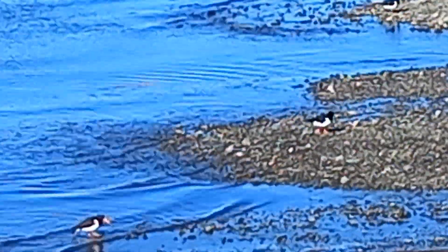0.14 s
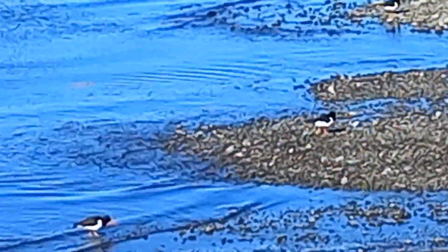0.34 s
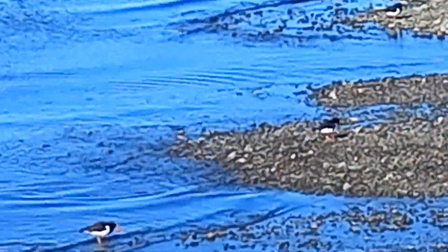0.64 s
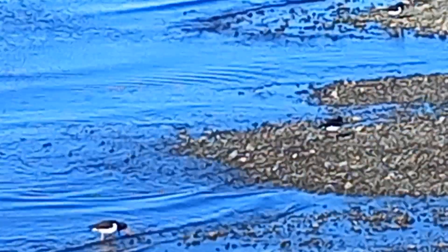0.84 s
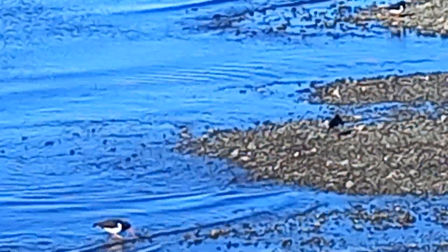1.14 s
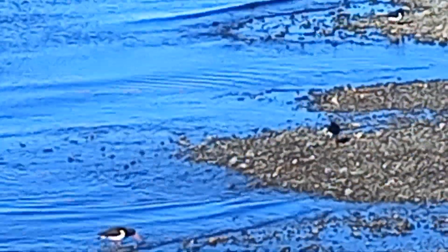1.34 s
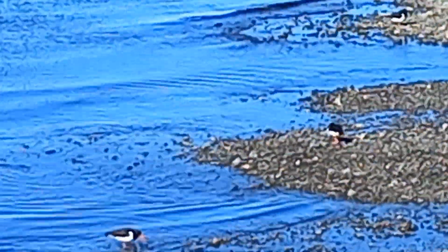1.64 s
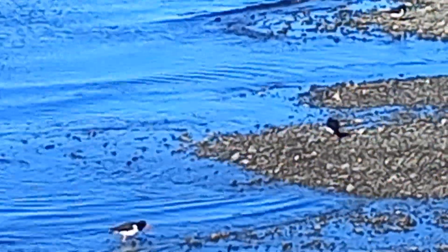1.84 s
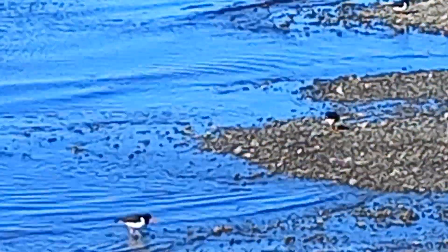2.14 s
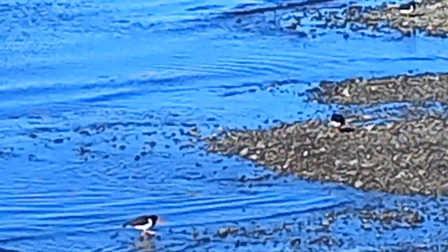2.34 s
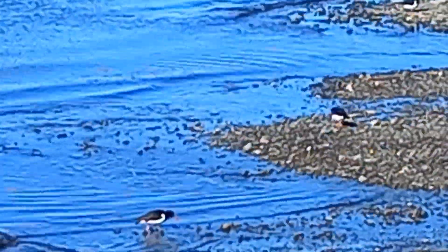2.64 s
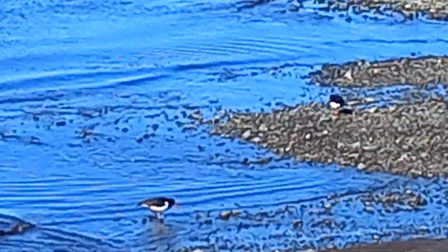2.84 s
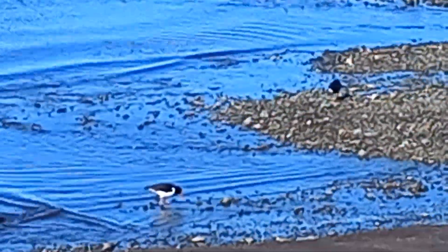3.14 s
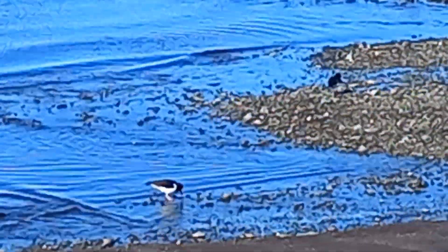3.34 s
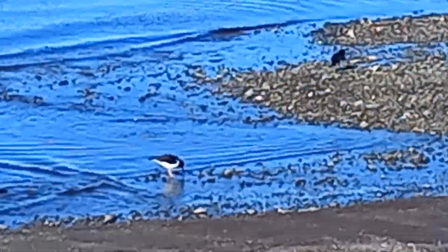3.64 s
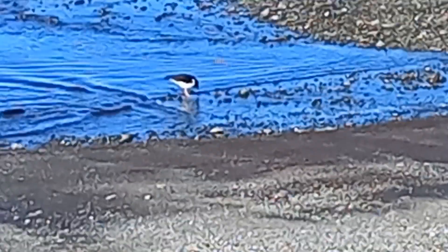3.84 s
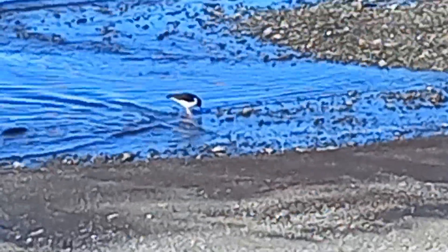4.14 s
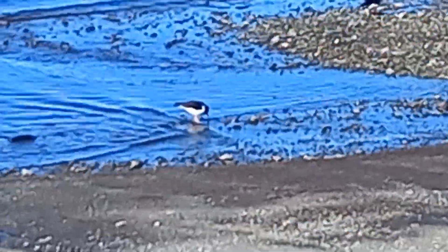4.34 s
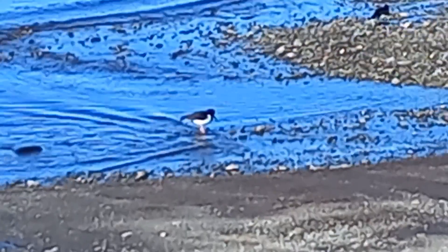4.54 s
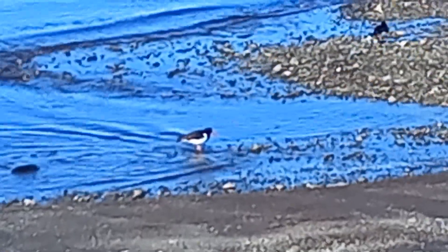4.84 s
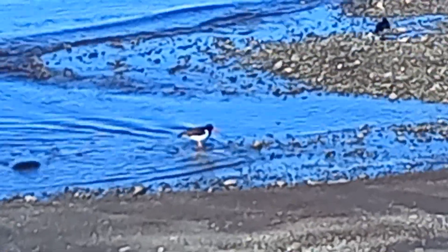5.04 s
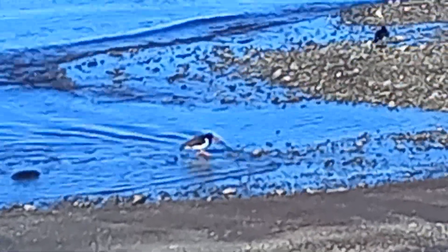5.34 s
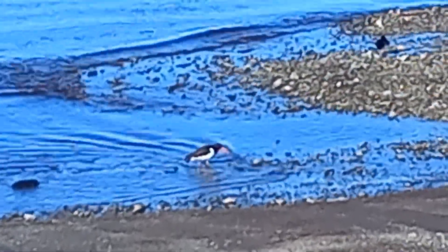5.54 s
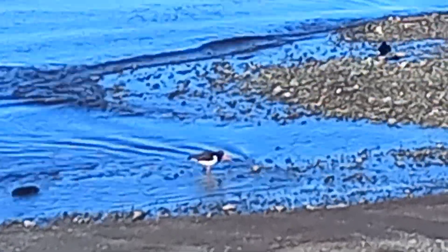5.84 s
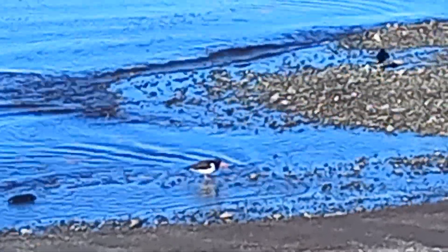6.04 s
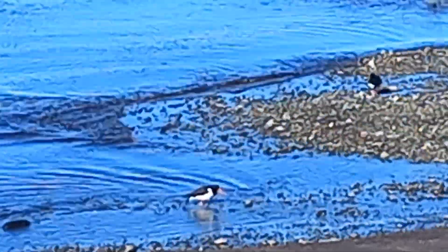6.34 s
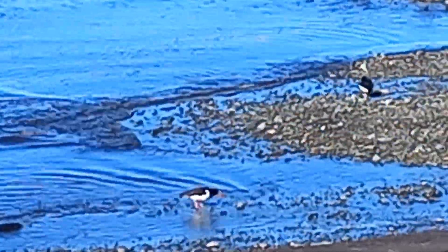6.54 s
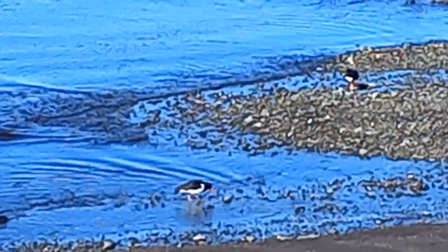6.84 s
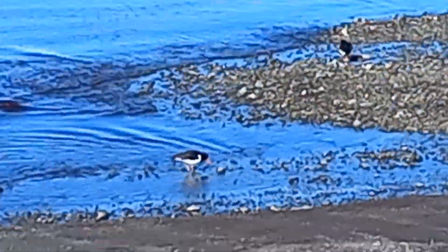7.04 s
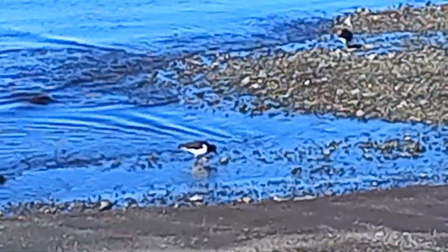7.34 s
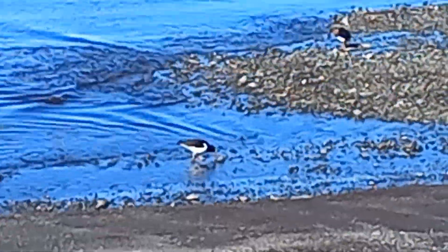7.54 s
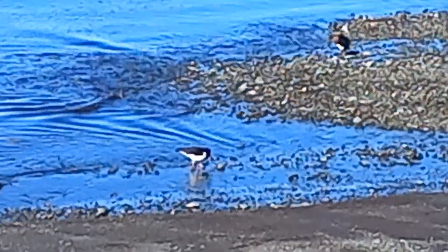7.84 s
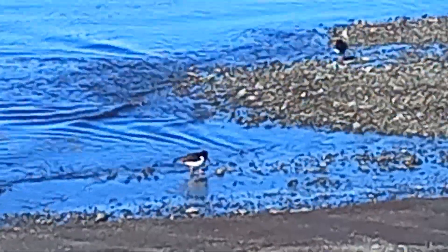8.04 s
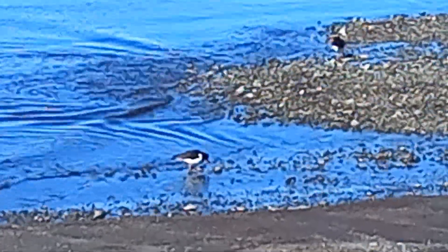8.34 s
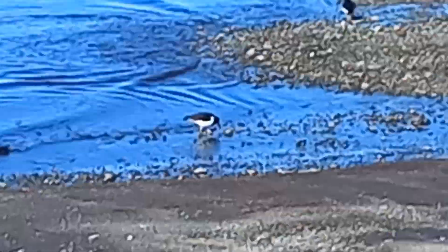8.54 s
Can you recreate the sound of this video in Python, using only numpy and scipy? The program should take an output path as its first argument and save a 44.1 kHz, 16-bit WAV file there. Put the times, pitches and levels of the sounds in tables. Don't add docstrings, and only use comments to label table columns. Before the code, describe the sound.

Throughout, a diesel engine idles at a steady pace, about twenty-two pulses a second, giving a low buzzing throb with fine metallic ticking, somewhat to the right, and a soft low fan hum. A muted wash of shore and engine noise fills the background. From 0.3 s, small wavelets gurgle quietly over stones on the left, returning in irregular short runs, fuller from 1.8 to 5.5 s. Wind thumps the left side, heaviest at 1.2 to 1.4 s, again near 1.8, 2.5 and 4.3 s. A harder metallic tick comes at 0.8 s. Drips and plops cluster around 1.8 to 2.3 s, then a faint wavering moan at 2.6 s. Hollow low surges swell ahead, strongest at 3.7, 4.4 and 4.9 s. A lone plop falls at 5.6 s, another surge at 6.8 s, and a bright drip with fine spray on the right at 7.3 s. It stops abruptly at 8.6 s.

```python
import sys
import numpy as np
from scipy import signal
from scipy.fft import rfft, irfft, next_fast_len
from scipy.io import wavfile
from scipy.ndimage import uniform_filter1d

SR = 44100
rng = np.random.default_rng(int(sys.argv[2]) if len(sys.argv) > 2 else 0)


def amplitude_ratio(level_db):
    exponent = np.asarray(level_db, float) / 20
    return 10 ** exponent


def to_wav(sig):
    pcm = np.clip(np.atleast_2d(sig), -1, 1) * 32767
    pcm = np.round(pcm).astype(np.int16)
    wavfile.write(sys.argv[1], SR, pcm.T)


N = 383229
LAG_SAMPLES = 19.4

# (time [s], rate [Hz])
FIRING_RATE = [(0.0, 21.877), (0.6, 22.075), (1.4, 21.757), (2.0, 21.9), (2.4, 22.091), (4.0, 21.93),
               (5.0, 21.932), (5.4, 22.127), (5.8, 21.919), (6.0, 22.022), (6.6, 22.043), (7.2, 21.876),
               (8.2, 22.044), (8.6, 21.71)]
# (multiple of firing rate [1], left level [dB], right level [dB])
EXHAUST_ORDERS = [(2.0, -61, -60), (3.0, -49, -50), (4.0, -50, -55), (5.0, -49, -52), (6.0, -51, -51),
                  (7.0, -42, -43), (7.5, -59, -60), (8.0, -46, -48), (8.5, -66, -77), (9.0, -58, -62),
                  (10.0, -69, -64), (11.0, -68, -70), (13.0, -61, -65), (14.0, -65, -66), (16.0, -63, -65),
                  (18.0, -69, -69), (20.0, -70, -75), (22.0, -75, -71)]
# (left level [dB], right level [dB], decay to -60 dB [s], delay [firings], share of a hard blow [1])
VALVE_PARTS = [(-84, -80.5, 0.037, 0.18, 0.81), (-82.5, -81.5, 0.014, 0.13, .6),
               (-94, -83, .015, 0.043, .4), (-94, -84, 0.063, .3, .3), (-95, -80.5, .03, 0.089, 0.71),
               (-100, -80.5, 0.0083, 0.17, 0.25), (-106, -109.5, .02, 0.5, 0.33), (-108, -97, .01, .55, .3),
               (-73, -69.5, 0.076, 0.27, 0.092), (-100, -91, .001, 0.093, 0.2)]
VALVE_HZ = [3737, 3640, 5450, 6274, 7497, 8350, 11060, 11480, 950, 13500]
CYLINDERS_DB = [5, 3, 5, -3]
# (time [s], level [dB])
HARD_BLOWS = [(0.0922, -65), (0.1999, -63), (0.2877, -64), (0.3805, -64), (0.6045, -67), (0.6659, -65),
              (0.7861, -50), (1.1563, -63), (1.3339, -58), (1.477, -63), (1.6541, -65), (1.7015, -65.5),
              (2.2039, -64), (2.384, -60), (2.4718, -62), (2.7467, -67), (2.9796, -58), (3.3872, -60),
              (4.0238, -64), (4.2477, -67), (4.2981, -56), (4.6144, -58), (5.2106, -63), (7.2095, -63),
              (7.3008, -62), (7.4824, -67), (7.7533, -67), (7.8461, -61), (8.3933, -56)]
# (peak time [s], level [dB], length [s])
LOOSE_SPELLS = [(.25, 5, 0.44), (1.12, 1, 0.31), (1.421, 3, .2), (1.75, 3.5, .4), (2.25, 3, .5),
                (2.78, 4, .15), (3.282, 5.5, .3), (3.72, 6.5, 0.37), (4.3, 3, .15), (5.057, 1, .12),
                (6.067, 1, .15), (6.85, 0.5, .3), (7.3, -4, .25), (7.7, 2.5, 0.39), (8.5, 2, .3)]
# (peak time [s], gurgle level [dB], length [s], fizz above gurgle [dB])
WAVELETS = [(0.322, -72.5, .15, 0.5), (.52, -71, .12, -14), (1.36, -71, .12, -6), (1.85, -67.5, 0.26, -13),
            (2.1, -67.5, 0.52, -8), (2.948, -68, 0.23, -11), (3.205, -62.5, 0.39, -7),
            (3.544, -69, 0.32, -5), (3.83, -67, 0.29, -2.5), (4.247, -70, 0.32, -8),
            (4.5, -67.5, 0.18, -11), (4.853, -69.5, 0.4, -13), (5.25, -68.5, .35, -5.5),
            (5.548, -75, 0.23, -4), (6.05, -82, .2, -2), (6.472, -72, 0.26, -8), (6.85, -69, 0.34, -9),
            (7.2, -72, .12, -10), (7.349, -71, 0.22, -3), (7.79, -73, 0.13, -7), (8.45, -71, .3, -5.5)]
# (frequency [Hz], level [dB])
GURGLE_COLOUR = [(500, -60), (900, -7), (1500, -7), (2100, -1), (2600, 0), (3300, -6), (4500, -40)]
FIZZ_COLOUR = [(2500, -40), (3400, -5), (4400, 0), (5200, -4), (6500, -10), (9000, -14), (12000, -40)]
SPRAY_COLOUR = [(3000, -41), (6000, -1), (9000, 1), (12000, -7), (15000, -15)]
# (time [s], level [dB], frequency [Hz], left over right [dB])
DRIPS = [
    (1.804, -55, 2020, 9),
    (2.089, -57, 3000, 12),
    (2.14, -56, 1880, 11),
    (2.160, -53, 2750, 7),
    (2.263, -52, 4450, 6),
    (5.64, -58, 1770, 4),
    (7.333, -48, 8000, -8),
]
# (peak time [s], level [dB], length [s])
SURGES = [(.75, -47, 0.13), (1.0, -49.5, .2), (1.318, -47, 0.34), (1.867, -48, 0.17), (2.14, -49, .1),
          (2.557, -47.5, 0.32), (3.0, -51.5, 0.17), (3.704, -41.5, 0.5), (4.06, -48.5, 0.26),
          (4.364, -39.5, 0.27), (4.916, -42, 0.42), (5.7, -51, .1), (6.6, -51.5, .2), (6.8, -44.5, 0.16),
          (7.0, -50, 0.34), (7.53, -48.5, .12), (7.85, -50.5, .1), (8.32, -47.5, 0.11), (8.547, -50, 0.091)]
# (frequency [Hz], level [dB])
SURGE_COLOUR = [(40, -41), (100, -2), (180, -3.5), (280, 1), (420, -8), (500, -14.5), (620, -29),
                (1200, -110)]
# (time [s], frequency [Hz], level [dB])
MOAN = [
    (2.48, 557, -76),
    (2.53, 583, -52.5),
    (2.62, 587, -53),
    (2.68, 538, -56),
    (2.73, 495, -82),
]
# (peak time [s], level [dB], length [s])
THUMPS = [(.14, -42, 0.17), (.33, -40.5, .14), (1.03, -46, .08), (1.18, -28.5, 0.098), (1.28, -31, 0.097),
          (1.364, -30, .1), (1.55, -43, 0.33), (1.782, -33.5, 0.089), (2.14, -40, 0.096), (2.36, -43, 0.11),
          (2.503, -35.5, 0.079), (3.827, -40, 0.13), (4.33, -35, 0.11), (5.98, -41, .1)]
# (frequency [Hz], level [dB])
WIND_COLOUR = [(35, -45), (55, -2.5), (75, 5.5), (100, -5.5), (140, 2.5), (200, -13.5), (300, -29),
               (500, -55), (1000, -110)]
# (frequency [Hz], density [dB per Hz])
WASH_LEFT = [(30, -104), (50, -90), (80, -71), (150, -67.5), (300, -73.5), (600, -77.5), (1000, -83),
             (1500, -94), (2800, -104), (4000, -103), (8500, -108), (10300, -118), (13500, -117),
             (15600, -114)]
WASH_RIGHT = [(30, -104), (50, -94), (80, -69.5), (150, -67.5), (300, -72), (900, -85), (1500, -93.5),
              (2500, -110), (3300, -103), (5500, -102), (8600, -107), (9500, -113), (11000, -111),
              (12500, -116)]
# (frequency [Hz], likeness [1])
LIKENESS = [(60, 1), (250, 0.6), (450, 0.37), (1000, 0.87), (1500, 0.15), (6000, 0.09), (10000, 0.05)]
# (frequency [Hz], width [Hz], left [dB], right [dB])
HOUSING = [(1000, 380, 1, 2), (1240, 87, -1.5, 0.5), (1463, 170, 3, 1.5), (1770, 510, 2.2, -4),
           (2670, 320, -1.5, -1.5), (3220, 320, 1.5, 1), (3920, 390, -0.5, 2.5), (4420, 300, -0.5, -3),
           (7040, 540, -0.5, -3), (9000, 350, 2.5, -7), (9800, 360, 6, 1), (11100, 860, -11, 4),
           (14000, 2400, 1.5, -1)]


def exhaust(turns):
    out = np.zeros((2, N))
    pipe_turns, pipe_spread = .27, .0143
    for order, left_db, right_db in EXHAUST_ORDERS:
        k = round(2 * order) / 2
        delay = pipe_turns * (k - 7) + pipe_spread * (k - 7) ** 2
        phase = 2 * np.pi * (k * turns - delay)
        side = left_leads(k * FIRING_RATE[0][1]) / 2 * np.array([[1], [-1]])
        level = ports_gain(left_db, right_db) * amplitude_ratio(0.49 * drift(2.4))
        out += level * np.sqrt(2) * np.cos(phase + side)
    return out


def valves(turns):
    out = np.zeros((2, N))
    luck = rng.standard_normal((int(turns[-1]) + 3, len(VALVE_PARTS)))
    hard_db = np.zeros(len(luck))
    blow_s, db = np.transpose(HARD_BLOWS)
    hard_firing = np.round(turns[(blow_s * SR).astype(int)] - .2).astype(int) + 1
    hard_db[hard_firing] = db + 69.5
    for part, (hz, row) in enumerate(zip(VALVE_HZ, VALVE_PARTS)):
        left_db, right_db, t60, late, share = row
        firing = np.floor(turns - late).astype(int) + 1
        blow_db = np.take(CYLINDERS_DB, firing - 1, mode="wrap")
        blow_db = blow_db + share * hard_db[firing] + 1.8 * luck[firing, part]
        shake = .45 + amplitude_ratio(blow_db) * np.exp(-((turns - late) % 1) / .28)
        rattle = shake * rng.standard_normal((2, N))
        rattle[0] += 0.35 * np.roll(rattle[1], round(LAG_SAMPLES))
        r = amplitude_ratio(-60 / (t60 * SR))
        poles = [1, -2 * r * np.cos(2 * np.pi * hz / SR), r * r]
        ring = signal.lfilter([1, 0, -1], poles, rattle)
        out += ports_gain(left_db, right_db) * np.array([evened(port) for port in ring])
    return out * swells(*np.transpose(LOOSE_SPELLS), rise=0.44, floor_db=0)


def fan():
    hz = 250 + 0.5 * drift(1.43)
    tone = np.sin(2 * np.pi * np.cumsum(hz) / SR)
    return np.sqrt(2) * tone * amplitude_ratio(-49.5 + 0.98 * drift(5.6)) * ports_gain(-1.2, 1.2)


def water():
    bubbles = bubble_shower()
    peak_s, peak_db, length_s, fizz_db = np.transpose(WAVELETS)
    running = swells(peak_s, peak_db, length_s, rise=0.48, floor_db=-80)
    foaming = swells(peak_s, peak_db + fizz_db, length_s, rise=0.48, floor_db=-87)
    spraying = swells(7.34, -75, .14, rise=0.58, floor_db=-100)
    gurgle = np.array([coloured(port, GURGLE_COLOUR) for port in bubbles]) * running
    fizz = np.array([coloured(port, FIZZ_COLOUR) for port in bubbles]) * foaming
    spray = coloured(bubbles[1], SPRAY_COLOUR) * spraying
    out = gurgle * ports_gain(1, -11) + fizz * ports_gain(3, -1.5) + spray * ports_gain(-6, 0)
    t = np.arange(400) / SR
    for start_s, db, hz, pan_db in DRIPS:
        ring = np.sin(2 * np.pi * hz * t * (1 + 6.0 * t))
        drip = amplitude_ratio(db) * ring * np.exp(-t * hz / 8) * np.minimum(t * hz / 3, 1)
        start = round(start_s * SR)
        out[:, start:start + len(t)] += drip * ports_gain(pan_db / 2, -pan_db / 2)
    return out


def bubble_shower():
    t, bubbles = np.arange(400) / SR, np.zeros((2, N))
    struck = rng.random((2, N)) < 3000 / SR
    pops = struck * amplitude_ratio(2.6 * np.minimum(rng.exponential(1, (2, N)), 3.5))
    sizes = rng.integers(0, 16, (2, N))
    for size, hz in enumerate(np.geomspace(1100, 10000, 16)):
        ring = np.sin(2 * np.pi * hz * t * (1 + 8.4 * t))
        bubble = ring * np.exp(-t * hz / 4.8) * np.minimum(t * hz, 1)
        bubbles += signal.oaconvolve(pops * (sizes == size), bubble[None] * np.sqrt(hz))[:, :N]
    bubbles[1] += 0.2 * np.roll(bubbles[0], -round(LAG_SAMPLES))
    return bubbles


def surge():
    ahead, near_left, near_right = rng.standard_normal((3, N))
    lumps = amplitude_ratio(1.2 * drift(15.))
    ports = [ahead + 0.49 * near_left, np.roll(ahead, 8) + 0.43 * near_right]
    roar = np.array([coloured(port * lumps, SURGE_COLOUR) for port in ports])
    roar = roar * swells(*np.transpose(SURGES), rise=.5, floor_db=-59)
    moan_hz = curve(MOAN) + 11.7 * drift(40.)
    moan_level = amplitude_ratio(curve(MOAN, order=2) + 2.0 * drift(30.))
    moan = np.sin(2 * np.pi * np.cumsum(moan_hz) / SR) * moan_level
    return roar * ports_gain(1, -1) + moan


def wind():
    eddies = coloured(rng.standard_normal(N) * amplitude_ratio(1.5 * drift(18.)), WIND_COLOUR)
    thumps = eddies * swells(*np.transpose(THUMPS), rise=0.44, floor_db=-62.5)
    return thumps * ports_gain(0, -18)


def wash():
    frames, hz = N // 256 + 5, np.fft.rfftfreq(1024, 1 / SR)
    a, b, c, d, patches = rng.standard_normal((frames, 513, 5)).T
    patches = evened(uniform_filter1d(uniform_filter1d(patches, 14, 0), 12, 1))
    flicker = evened(uniform_filter1d(rng.standard_normal(frames), 6))
    flicker = flicker * np.clip(hz / 2500, 0, 1)[:, None]
    same = np.clip(read(LIKENESS, hz), 0, 1)[:, None]
    right = a + 1j * b
    shared = same * right * np.exp(1j * left_leads(hz))[:, None]
    left = shared + np.sqrt(1 - same ** 2) * (c + 1j * d)
    colour_db = np.array([read(WASH_LEFT, hz), read(WASH_RIGHT, hz)])[:, :, None]
    spectra = np.array([left, right]) * amplitude_ratio(colour_db + 1.2 * patches + 0.81 * flicker)
    return amplitude_ratio(16.5) * signal.istft(spectra, nperseg=1024, noverlap=768)[1][:, :N]


def left_leads(hz):
    return 0.73 * np.exp(-(hz / 1800) ** 2) - 2 * np.pi * hz * LAG_SAMPLES / SR


def ports_gain(left_db, right_db):
    return amplitude_ratio(np.array([[left_db], [right_db]]))


def swells(peak_s, peak_db, length_s, rise, floor_db):
    t = np.arange(0, N + 100, 100) / SR
    since = t - np.reshape(peak_s, (-1, 1))
    half = np.where(since < 0, rise, 1 - rise) * np.reshape(length_s, (-1, 1))
    power = amplitude_ratio(np.reshape(peak_db, (-1, 1)) - 6 * (since / half) ** 2) ** 2
    return np.interp(np.arange(N) / SR, t, np.sqrt(power.sum(0) + amplitude_ratio(floor_db) ** 2))


def drift(hz):
    rate = 100
    steps = rng.standard_normal(N // rate + 1000)
    lowpass = signal.butter(2, hz, fs=SR / rate, output="sos")
    slow = signal.sosfilt(lowpass, steps)[900:]
    return np.interp(np.arange(N) / rate, np.arange(len(slow)), evened(slow))


def coloured(x, colour):
    size = next_fast_len(N)
    gain = amplitude_ratio(read(colour, np.fft.rfftfreq(size, 1 / SR)))
    return evened(irfft(rfft(x, size) * gain, size)[:N])


def evened(x):
    return x / np.sqrt(np.mean(x ** 2) + 1e-20)


def read(points, hz):
    f, value = np.transpose(points)
    return np.interp(np.log(hz + 1), np.log(f + 1), value)


def curve(rows, order=1):
    columns = np.transpose(rows)
    return np.interp(np.arange(N) / SR, columns[0], columns[order])


def scene():
    turns = -.013 + np.cumsum(curve(FIRING_RATE)) / SR
    engine = exhaust(turns) + valves(turns) + fan()
    shore = water() + surge()
    return engine + shore + wind() + wash()


def top_cut(x):
    return signal.sosfilt(signal.butter(12, 16720, fs=SR, output="sos"), x)


def record(dry):
    size = next_fast_len(N)
    hz = np.fft.rfftfreq(size, 1 / SR)
    housing_db = 0
    for f, width, *db in HOUSING:
        housing_db = housing_db + np.outer(db, np.exp(-(2 * (hz - f) / width) ** 2 / 2))
    housed = irfft(rfft(dry, size) * amplitude_ratio(housing_db), size)[:, :N]
    bass_cut = signal.butter(3, 26, "high", fs=SR, output="sos")
    miked = signal.sosfilt(bass_cut, housed)
    band_limit = signal.firwin(1201, 15735, window=("kaiser", 9), fs=SR)
    limited = signal.oaconvolve(miked, band_limit[None], "same")
    end_s = 8.6149
    return top_cut(limited * (np.arange(N) < end_s * SR))


dry = scene()
out = record(dry)
to_wav(out)
```